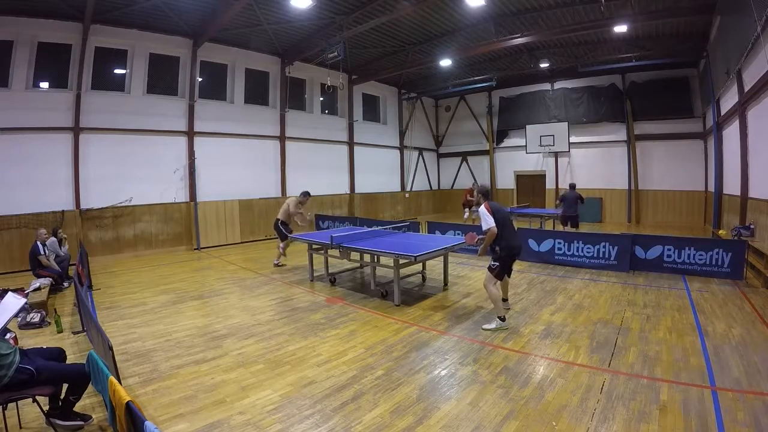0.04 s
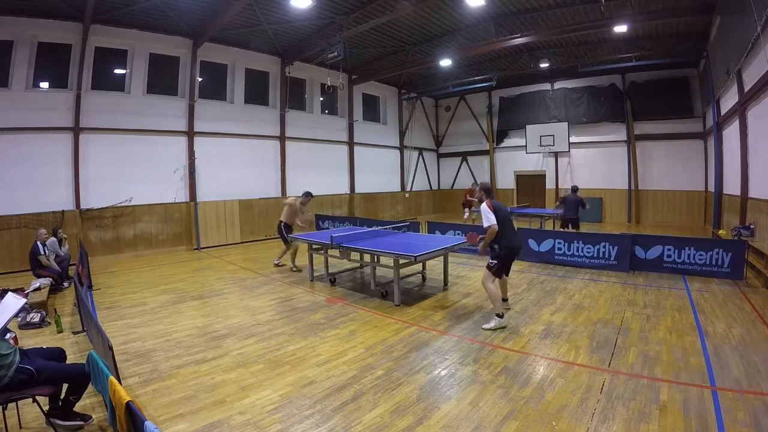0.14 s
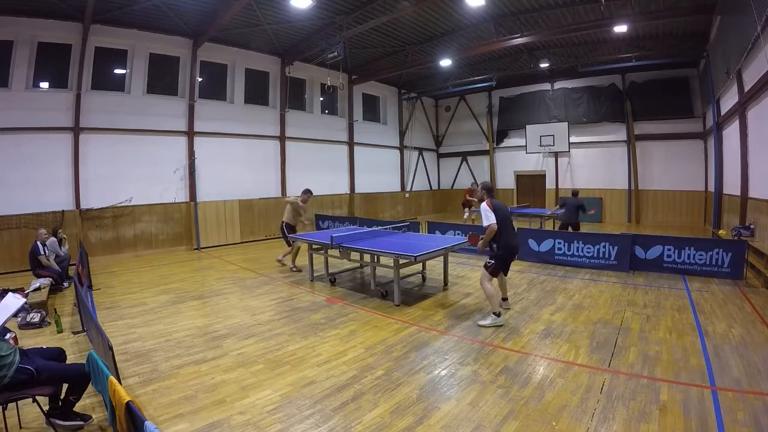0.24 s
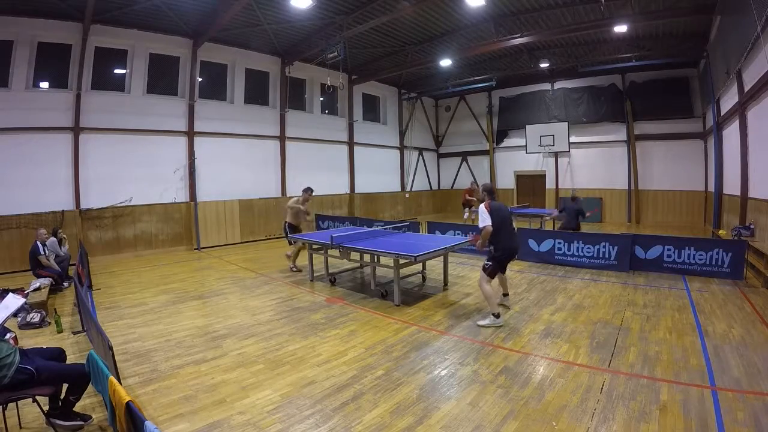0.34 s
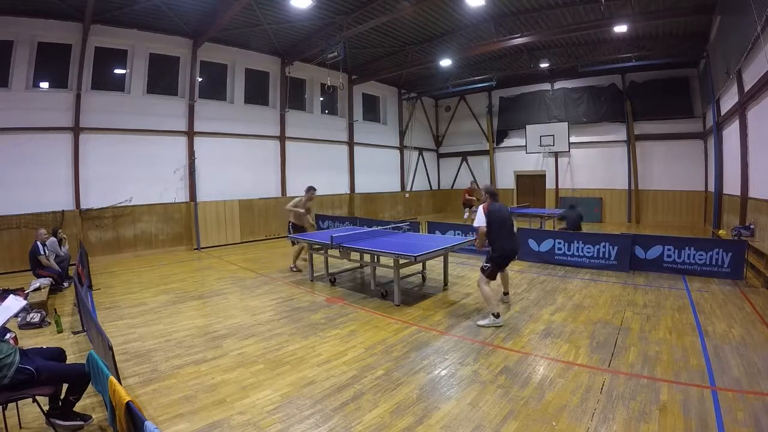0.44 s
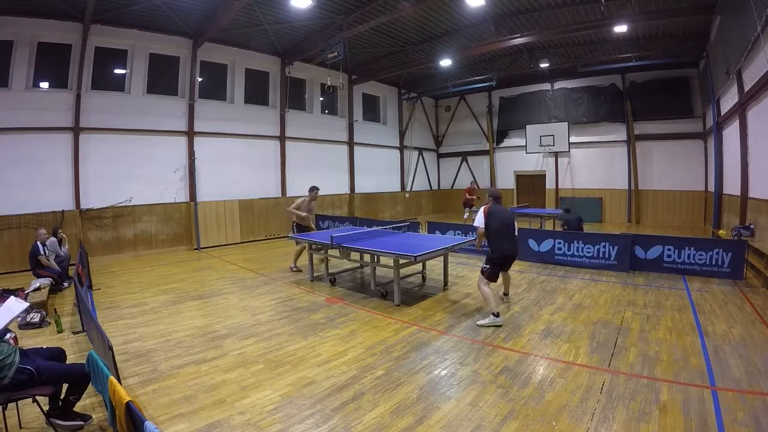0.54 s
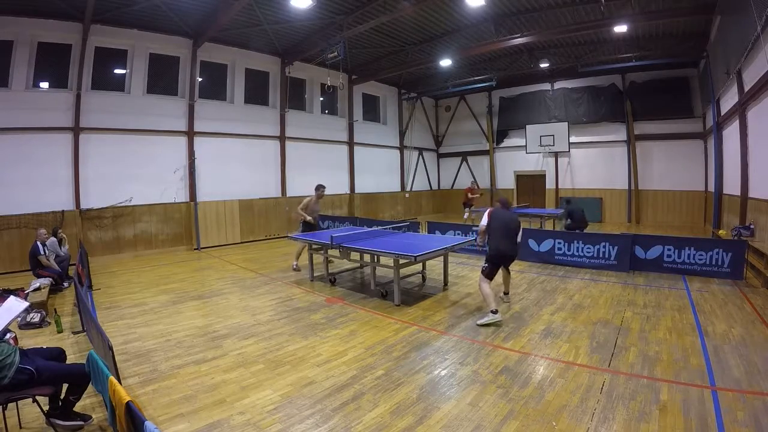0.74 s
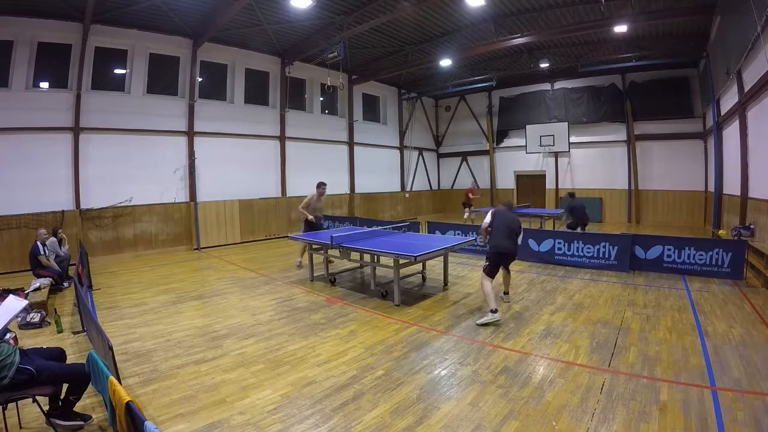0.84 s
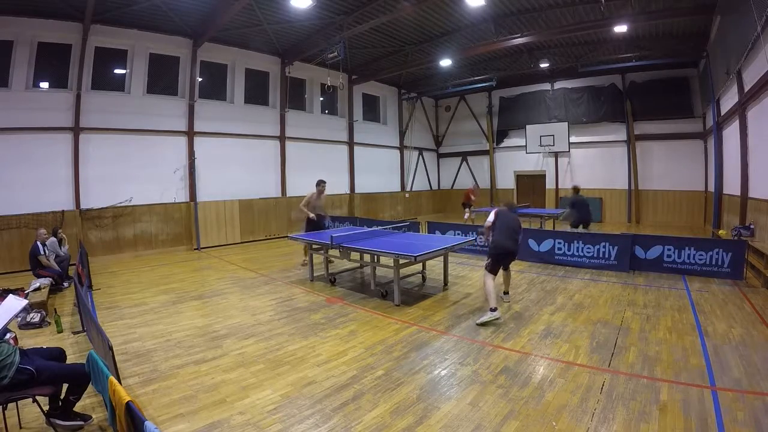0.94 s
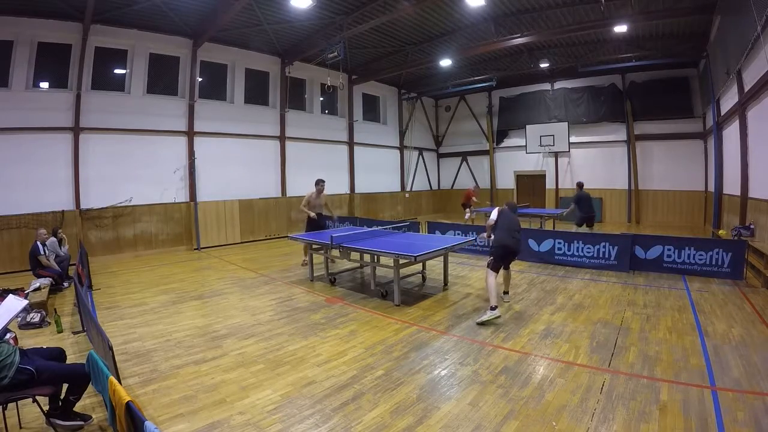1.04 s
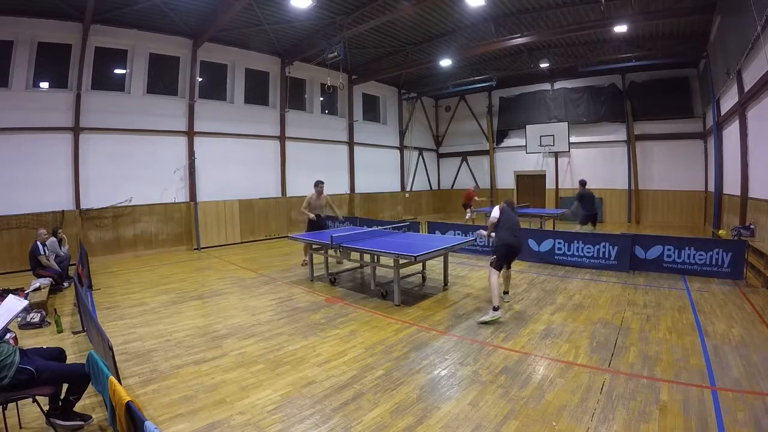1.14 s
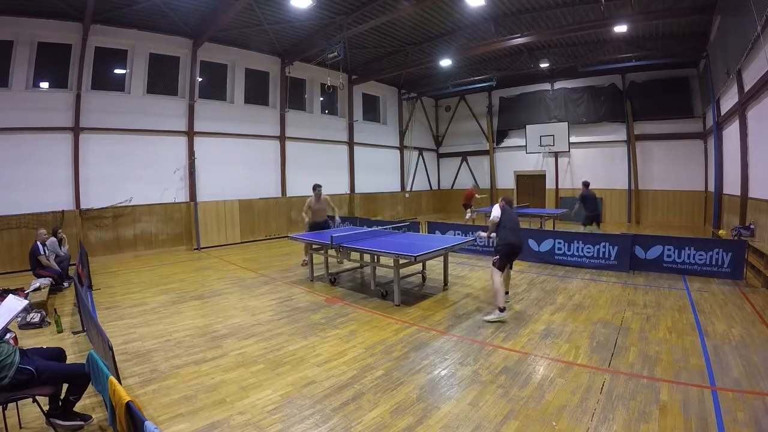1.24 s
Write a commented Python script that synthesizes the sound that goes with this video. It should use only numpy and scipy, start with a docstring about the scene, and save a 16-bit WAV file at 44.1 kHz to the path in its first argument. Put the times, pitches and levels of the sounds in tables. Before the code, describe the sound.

A table tennis bat hits the ball once, with a foot stamp, in an echoing hall.

```python
"""Table tennis stroke in a wooden hall

A bat strikes the ball a few metres away: the impact radiates a crack and excites the blade's modes.
The player stamps with the stroke, so the shoe slaps and the sprung floor booms. The large sports hall
reverberates for over a second above a low rumble, faint ticks, a scuff and a thin electrical whine."""
import sys
import numpy as np
from scipy import signal
from scipy.fft import rfft, irfft
from scipy.io import wavfile

SR = 44100
rng = np.random.default_rng(int(sys.argv[2]) if len(sys.argv) > 2 else 0)


def inscribe(sig):
    """Save sig as 16-bit PCM at rate SR to the path in sys.argv[1].

    A 1-D sig is mono; a 2-D sig holds one channel per row.
    Samples are clipped to [-1, 1] before scaling.
    """
    pcm = np.round(np.clip(np.atleast_2d(sig).T, -1, 1) * 32767)
    wavfile.write(sys.argv[1], SR, pcm.astype(np.int16))


N = 57330

# Spectrum of the room noise (frequency [Hz], relative level [dB])
ROOM_SPECTRUM = [(25, -13.5), (45, -18.5), (66, 5.5), (85, -4.5), (115, -18), (260, -26.5), (427, -31),
                 (800, -35.5), (1700, -32.5), (2900, -37.5), (3500, -31.5), (4500, -41.5), (8000, -45),
                 (12000, -49.5), (14300, -48), (15500, -55)]
# Distant ticks (time [s], level [dB], centre [Hz], half-width [Hz], t60 [s])
FAR_TICKS = [(.14, -62.5, 3420, 648, 3.6), (.145, -64, 1290, 531, 2.3), (.642, -60, 10500, 3600, 0.031),
             (.66, -69, 10200, 3400, .8)]
# A shoe brushing the boards (time [s], level [dB], centre [Hz], half-width [Hz], t60 [s])
SHOE_SCUFF = [(.96, -70, 8400, 3520, 2.8)]
# Thuds and slaps of the stamp (time [s], level [dB], centre [Hz], half-width [Hz], t60 [s])
SHOE_SLAPS = [(.201, -34, 205, 75, 0.3), (.243, -31, 192, 90, 0.22), (.25, -37, 607, 168, 0.32),
              (.246, -35.5, 1390, 840, 0.26), (.276, -30.5, 1094, 235, 0.21),
              (.278, -28.5, 1576, 497, 0.051)]
# Full weight on the heel, then on the sole (time [s], level [dB])
FOOT_LOADS = [(.268, -15), (.3118, -16)]
# Modes of the sprung floor (frequency [Hz], relative level [dB], t60 [s])
SPRUNG_FLOOR_MODES = [(67.1, 0, .36), (87.6, 0, .29), (96.6, -13, .9)]
# Standing waves of the hall (frequency [Hz], level [dB], t60 [s])
STANDING_WAVES = [(55.5, -15, 2.1), (82.2, -18, 1.8)]
# Spectrum of the reverberant boom (frequency [Hz], relative level [dB])
BOOM_SPECTRUM = [(25, -22), (42, -9), (55, -4), (92, 0), (115, -5), (145, -17), (275, -19), (390, -43),
                 (1500, -100)]
# Reverberation time of the hall (frequency [Hz], t60 [s])
REVERB_TIMES = [(100, 4.8), (260, 1.86), (700, 3.23), (1400, 3.55), (2500, 3.2), (3600, 2.66), (5000, 1.93),
                (8000, 1.36), (14000, 0.57)]
# Spectrum of the stroke as the hall returns it (frequency [Hz], relative level [dB])
RETURN_SPECTRUM = [(150, -10.5), (280, 3), (390, -11), (620, -7.5), (820, -11.5), (1100, -10), (1270, 0),
                   (1480, -4), (1780, 0), (2200, -4), (2950, -8), (3330, 3), (3850, 0.5), (4200, -11.5),
                   (4650, -8.5), (5200, -16.5), (5700, -13), (6300, -18), (8200, -20), (9800, -29.5),
                   (11500, -29), (15000, -44)]
# Reflections from nearby surfaces (delay [s], relative level [dB])
NEAR_ECHOES = [(.0128, -15), (0.022, -16)]
# Spectrum of the contact crack (frequency [Hz], relative level [dB])
CRACK_SPECTRUM = [(300, 10), (1500, -25), (4000, 19.5), (5700, 0.5), (7200, -8.5), (10000, -15),
                  (15000, -25)]
# Modes of bat and ball (frequency [Hz], relative level [dB], t60 [s])
BAT_BALL_MODES = [(1684, -12.5, 0.017), (2170, -17.5, 0.014), (2850, -17, 0.036), (3330, -12, 0.015),
                  (3895, -1, 0.0058), (4570, -12.5, 0.026), (4670, -17, 0.045), (5650, -18, 0.036)]

STROKE_S, LOAD_RISE_S = .2105, .063
ROOM_DB, WHINE_DB, BOOM_TAIL_DB = -48, -65.5, -27
STROKE_DB, SCATTER_DB, REVERB_DB = -16, -31.5, -31


def undb(db):
    """Amplitude ratio: tenfold for every 20 dB."""
    return 10 ** (np.asarray(db) / 20)


def since(onset):
    """Time axis in seconds with its origin at the onset."""
    return np.arange(N) / SR - onset


def noise(gain):
    """Fourier synthesis: random phases under the spectrum gain(Hz) give noise of rms 1."""
    hz = np.arange(N // 2 + 1) * SR / N
    phases = np.exp(2j * np.pi * rng.random(len(hz)))
    wave = irfft(gain(hz) * phases, N)
    return wave / np.sqrt(np.mean(wave ** 2))


def at_hz(points, hz):
    """Interpolation of a (frequency [Hz], value) table on a logarithmic frequency axis."""
    freqs, values = np.array(sorted(points), float).T
    return np.interp(np.log(np.maximum(hz, 1)), np.log(freqs), values)


def coloured(spectrum):
    """Spectral shaping: noise of rms 1 with a tabulated colour."""
    return noise(lambda hz: undb(at_hz(spectrum, hz)))


def strike(t, rise, t60):
    """Exponential damping: after a smooth rise, the level falls 60 dB in t60 seconds."""
    attack = np.sin(np.pi / 2 * np.clip(t / rise, 0, 1)) ** 2
    return attack * np.exp(-np.log(1000) * np.maximum(t - rise, 0) / t60)


def ring(modes, t, rise, lead=0):
    """Modal superposition: damped sinusoids that begin to swell lead seconds before t = 0."""
    return sum(undb(db) * np.sin(2 * np.pi * hz * t) * strike(t + lead, rise, t60)
               for hz, db, t60 in modes)


def bursts(rows, rise):
    """Resonant filtering: each contact is noise in one broad band, prolonged by the hall."""
    out = 0
    for onset, db, centre, width, t60 in rows:
        band = noise(lambda hz: 1 / (1 + ((hz - centre ** 2 / (hz + 1)) / width) ** 2))
        out += undb(db) * strike(since(onset), rise, t60) * band
    return out


def room_rumble():
    """Stationary noise: the background of the hall, strongest in the bass."""
    return undb(ROOM_DB) * coloured(ROOM_SPECTRUM)


def whine(pitch_hz=7150, wander_hz=80, pips_per_s=33, pip_s=.0042):
    """Amplitude modulation: electrical interference pulses a wavering tone and its octave."""
    from_pip = ((since(.024) * pips_per_s + .5) % 1 - .5) / pips_per_s
    pips = np.exp(-(from_pip / pip_s) ** 2)
    wander = wander_hz * noise(lambda hz: hz < 60)
    phase = 2 * np.pi * np.cumsum(pitch_hz + wander) / SR
    return undb(WHINE_DB) * pips * (np.sin(phase) + undb(-9) * np.sin(2 * phase))


def stamp():
    """Impact excitation: the shoe slaps, its load rings the floor, and the boom builds in the hall."""
    floor = sum(undb(db) * ring(SPRUNG_FLOOR_MODES, since(landing), rise=LOAD_RISE_S, lead=LOAD_RISE_S)
                for landing, db in FOOT_LOADS)
    since_heel = since(FOOT_LOADS[0][0])
    standing = ring(STANDING_WAVES, since_heel, rise=.065, lead=LOAD_RISE_S)
    tail = coloured(BOOM_SPECTRUM) * strike(since_heel, rise=.09, t60=1.7)
    return floor + standing + undb(BOOM_TAIL_DB) * tail + bursts(SHOE_SLAPS, rise=.0053)


def reverberation(bands=18):
    """Diffuse-field decay: each band of the stroke dies away at the hall's rate for that frequency."""
    t = since(STROKE_S + .008)
    spectrum = rfft(coloured(RETURN_SPECTRUM))
    log_hz = np.log(np.maximum(np.arange(len(spectrum)) * SR / N, 1))
    centres = np.geomspace(100, 15000, bands)
    tail = 0
    for hz, selector in zip(centres, np.eye(bands)):
        triangle = np.interp(log_hz, np.log(centres), selector)
        band = irfft(spectrum * triangle, N)
        tail += band * strike(t, rise=.0056, t60=at_hz(REVERB_TIMES, hz))
    return undb(REVERB_DB) * tail


def early_reflections(direct):
    """Specular and diffuse reflection: floor, table and near wall return echoes and scattered sound."""
    t = since(STROKE_S)
    echoes = sum(undb(db) * np.interp(t - delay, t, direct) for delay, db in NEAR_ECHOES)
    scatter = coloured(RETURN_SPECTRUM) * strike(t - .004, rise=.003, t60=.26)
    return echoes + undb(SCATTER_DB) * scatter


def bat_stroke():
    """Impulse response: the brief contact gives a broadband crack and leaves bat and ball ringing."""
    t = since(STROKE_S)
    crack = coloured(CRACK_SPECTRUM) * strike(t, rise=.0004, t60=.022)
    ringing = ring(BAT_BALL_MODES, t, rise=.0022)
    return undb(STROKE_DB) * (ringing + undb(-4) * crack)


def scene():
    """Linear superposition: the pressures of all sources and reflections add in one channel."""
    ticks = bursts(FAR_TICKS, rise=.0027)
    scuff = bursts(SHOE_SCUFF, rise=.064)
    direct = bat_stroke()
    stroke = direct + early_reflections(direct) + reverberation()
    return (ticks + scuff + stroke + stamp() + room_rumble() + whine())[None]


def record(dry, cutoff_hz=15200):
    """Band limiting: a steep elliptic low-pass removes the highest treble."""
    return signal.sosfilt(signal.ellip(10, .2, 80, cutoff_hz, fs=SR, output="sos"), dry)


dry = scene()
out = record(dry)
inscribe(out)
```